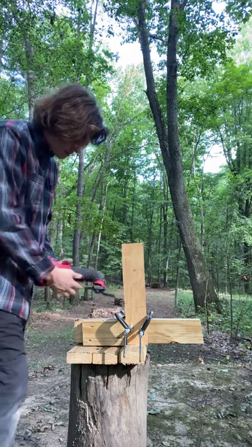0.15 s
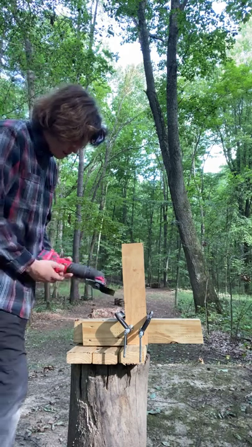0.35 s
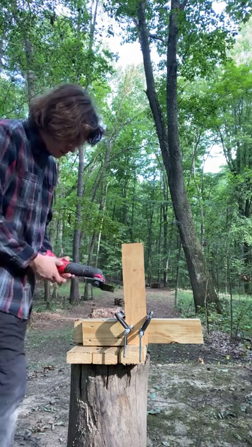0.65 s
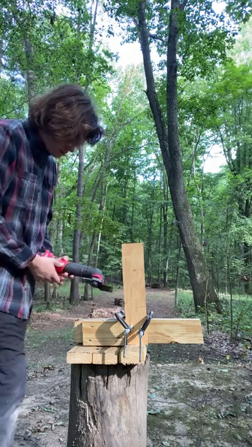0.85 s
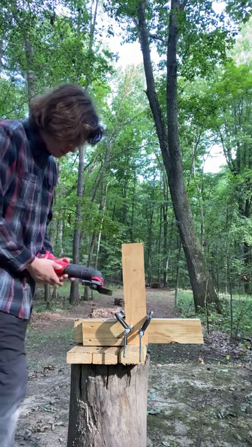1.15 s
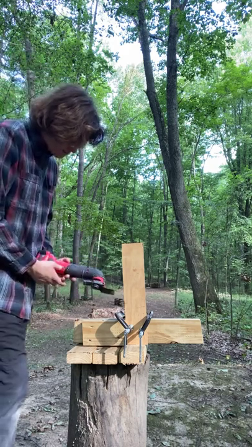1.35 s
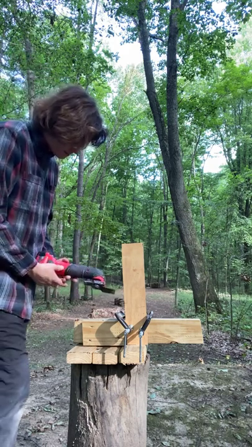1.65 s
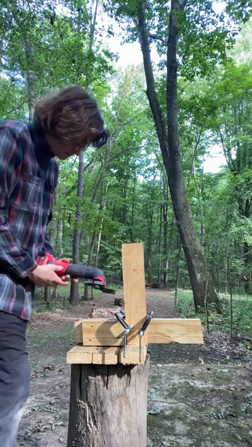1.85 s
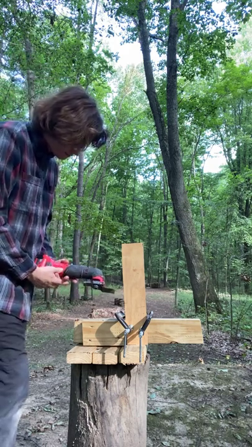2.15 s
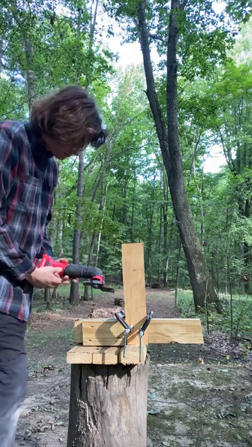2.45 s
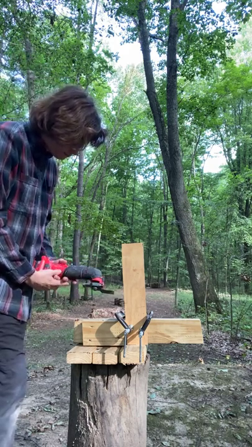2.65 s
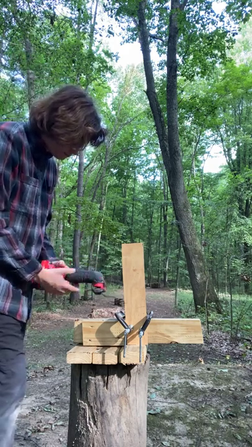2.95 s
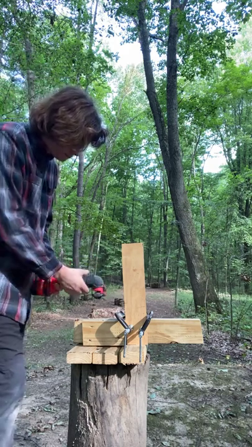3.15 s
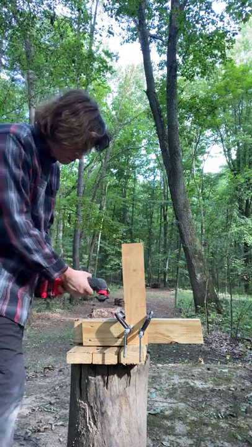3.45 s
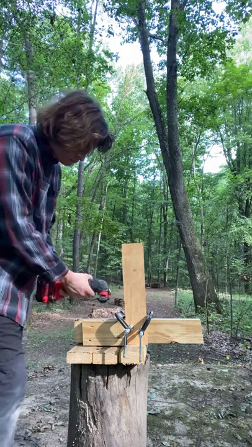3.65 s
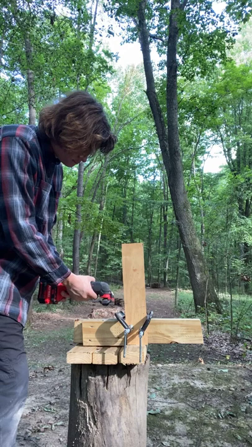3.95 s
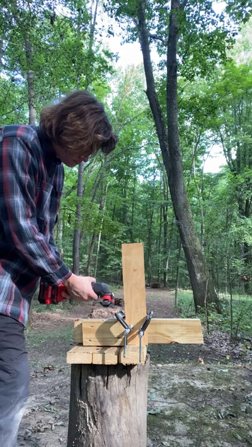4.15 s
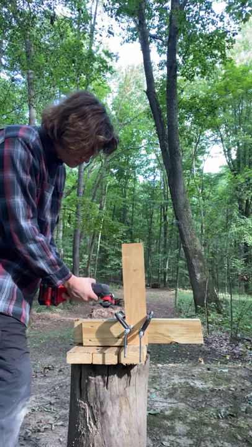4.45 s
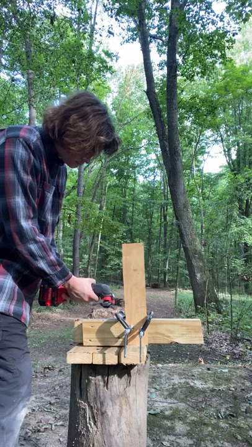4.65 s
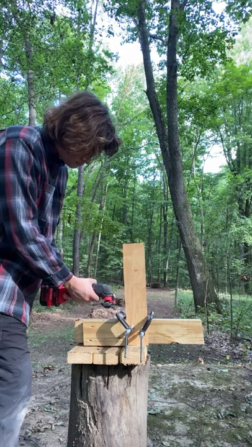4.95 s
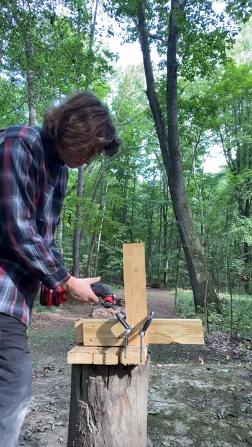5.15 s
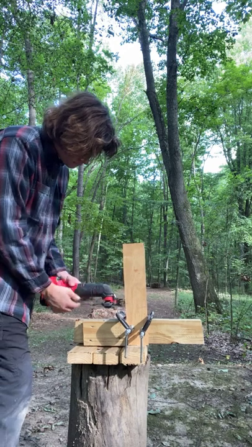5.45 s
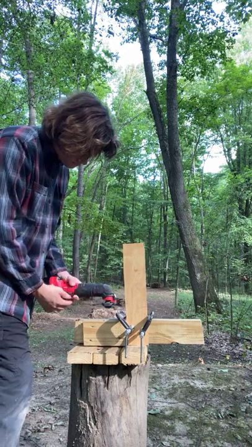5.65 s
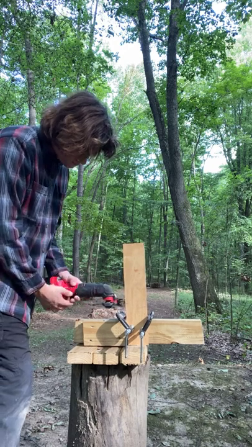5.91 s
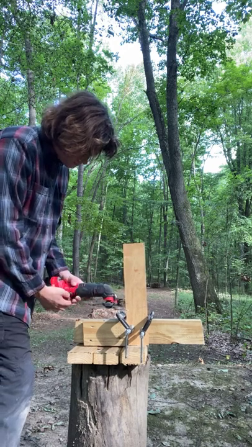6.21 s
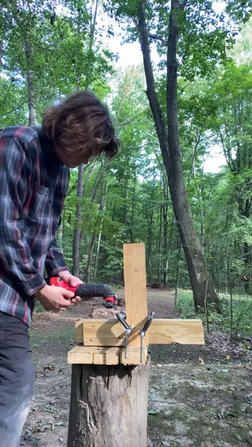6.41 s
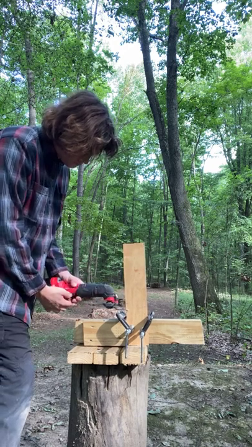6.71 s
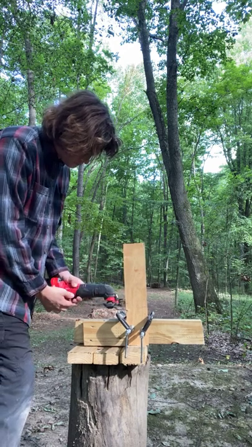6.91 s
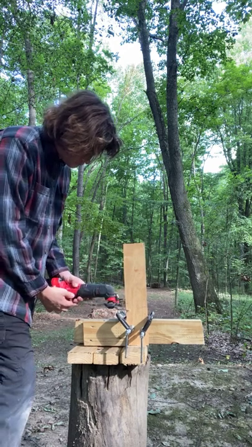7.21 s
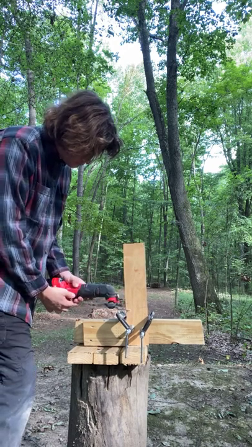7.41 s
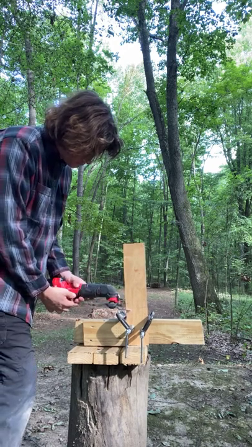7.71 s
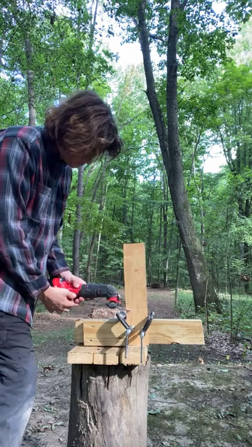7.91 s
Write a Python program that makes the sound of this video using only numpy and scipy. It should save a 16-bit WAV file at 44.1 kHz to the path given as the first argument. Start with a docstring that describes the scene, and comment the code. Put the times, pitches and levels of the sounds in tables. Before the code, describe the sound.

For over three seconds the forest is calm, with shimmering crickets, gentle air, far birds and low distant hum, broken by bright, crisp dial clicks. Then a heavy clack switches on an oscillating cutter, which whirs up almost instantly to a loud nasal buzz. Pressing into the board lowers its pitch and adds gritty, fluttering rasp and woody resonances. Near the end the load eases and pitch steps upward into a smoother whine. Close, dry, centred outdoor sound.

```python
"""Oscillating tool at work in the woods

A cordless oscillating tool is clicked up to speed setting, switched on and pushed into a plywood board.
Filtered noise gives the insect chorus and moving air; sines give far birds and a distant engine hum.
Each click rings decaying modes. The tool sums multiples and half multiples of its stroke rate with rasp
noise pulsed by each stroke and a narrow band of faint high hiss; load sags the speed and recolours
lines and rasp.
"""
import sys
import numpy as np
from scipy import signal
from scipy.io import wavfile
from scipy.ndimage import uniform_filter1d, map_coordinates

SR = 44100
rng = np.random.default_rng(int(sys.argv[2]) if len(sys.argv) > 2 else 0)


def inscribe(sig):
    """Save sig as 16-bit PCM at rate SR to the path in sys.argv[1].

    A 1-D sig is mono; a 2-D sig holds one channel per row.
    Samples are clipped to [-1, 1] before scaling.
    """
    pcm = np.round(np.clip(np.atleast_2d(sig).T, -1, 1) * 32767)
    wavfile.write(sys.argv[1], SR, pcm.astype(np.int16))


N = 355887

# Spectrum of the moving air: f/Hz, relative density/dB per Hz
AIR_SPECTRUM = [(25, -47), (40, -9.5), (60, -5), (120, -14), (170, -22.5), (260, -25), (600, -26.5),
                (1020, -22.5), (2430, -34), (3400, -42), (4400, -69)]
# Spectrum of the insect chorus: f/Hz, relative density/dB per Hz
CHORUS_SPECTRUM = [(1760, -70), (3000, -24.5), (3460, -15.5), (3570, -8.5), (3760, -12), (3860, -12),
                   (4390, 5), (5430, 1.5), (6420, 4), (7160, -2), (7890, -4.5), (8690, -15), (10200, -27.5),
                   (12800, -39), (14000, -47)]
# Level of the engine hum before its waver: t/s, level/dB
HUM_LEVEL = [(0.36, -58), (0.62, -43.5), (3.45, -44.5), (4.02, -63), (4.4, -66), (4.8, -51), (6.83, -53.5),
             (7.78, -70)]
# Other engine lines before waver and fade: f/Hz, level/dB
ENGINE_LINES = [(48, -64), (94, -72), (113, -55.5), (136, -59), (156, -66.5), (181, -65), (228, -64.5),
                (380, -74)]
# Fade of chorus, air and engine lines behind the tool: t/s, level/dB
SINKING = [(3.45, -0.5), (3.9, -6.5), (7, -15), (7.6, -21)]
# Bird whistles: t/s, length/s, first f/Hz, last f/Hz, level before swell and trees/dB
BIRDS = [(0, 0.5, 2510, 2490, -64), (.6, .13, 2350, 2300, -62), (.8, .3, 2600, 2590, -66),
         (1.31, .32, 3670, 3560, -47), (1.39, .21, 3480, 2890, -50), (2.235, .2, 3670, 3690, -48),
         (2.288, 0.24, 3590, 3070, -49)]
# Clicks and switch: t/s, peak level of the ring/dB, treble lift/dB per octave, share below 1 kHz/dB
CLICKS = [(0.6194, -34, 0, -20), (0.7193, -11, 8, -27), (1.66, -11, 8, -28), (1.738, -12, 11, -24),
          (2.6515, -11.5, 14, -24), (3.3689, -2, 1.5, -14)]
# Modes of the housing: f/Hz, relative level/dB, t60/s
HOUSING_MODES = [(820, -14, .02), (1850, -7, 0.0084), (2430, -7, .006), (3150, -5, 0.0044),
                 (3720, -8, 0.0074), (4807, 2.5, 0.0072), (5900, -6, 0.0058), (8070, -10, 0.004),
                 (9870, -14.5, 0.0033), (11530, -15.5, .003), (14000, -24, 0.0027)]

# Relative strength of the stroke multiples in each working state: multiple/1, level/dB
FREE = [(1, -25), (2, -9.5), (3, -4), (4, -12.5), (5, -10), (6, -23), (7, -5), (8, -11), (9, -5.5),
        (10, -10.5), (11, -5), (12, -4.5), (13, -14), (14, -0.5), (15, -11), (16, 2.5), (17, -2.5),
        (18, -4.5), (19, -12), (20, 0), (21, -15), (22, -2.5), (23, -25), (24, -8), (25, -13)]
TOUCHING = [(1, -18), (2, -11.5), (3, -4), (4, -19), (5, -33), (6, -4), (7, -31), (8, -22), (9, -3),
            (10, -9), (11, -6), (12, -9), (13, 1), (14, -3), (15, -3), (16, -7), (17, -5), (18, -1.5),
            (19, -15), (20, 2), (21, -8), (22, -19), (23, -23), (24, -19), (25, -11)]
BITING = [(1, -24), (2, -15.5), (3, -1), (4, -17), (5, -6.5), (6, 0.5), (7, 4.5), (8, -3), (9, 1.5),
          (10, -2), (11, 2.5), (12, -4), (13, 3), (14, 3), (15, -0.5), (16, -10), (17, -2), (18, 0),
          (19, -1.5), (20, -3), (21, -10), (22, -10), (23, -7), (24, -25), (25, -12)]
CUTTING = [(1, -22), (2, -16.5), (3, -16), (4, -8.5), (5, -12), (6, -13.5), (7, 5), (8, -6), (9, -3.5),
           (10, -4.5), (11, -6.5), (12, -10), (13, -7), (14, -9), (15, -8), (16, -7), (17, -21), (18, -9),
           (19, -25), (20, -12), (21, -8), (22, -7), (23, -7.5), (24, -8.5), (25, -19)]
PUSHING = [(1, -9), (2, -11), (3, -11), (4, -7.5), (5, -8), (6, -5.5), (7, 1.5), (8, -7), (9, -10),
           (10, 1.5), (11, -2), (12, -4), (13, -1.5), (14, -8), (15, 1.5), (16, -16), (17, -0.5), (18, -7),
           (19, -9), (20, -4), (21, -7), (22, 0.5), (23, -3), (24, -15), (25, -20)]
EASING = [(1, -19), (2, -17.5), (3, 3.5), (4, -17), (5, -5), (6, 1.5), (7, 5.5), (8, -2), (9, 1),
          (10, -2.5), (11, -2), (12, -1.5), (13, -2.5), (14, 0), (15, -4), (16, -5), (17, 0), (18, -1),
          (19, -6), (20, -0.5), (21, -10), (22, -19), (23, -22), (24, -14), (25, -7.5)]
THROUGH = [(0.5, -39), (1, -9), (1.5, -29.5), (2, -17.5), (2.5, -18), (3, -9.5), (3.5, -46), (4, -20),
           (4.5, -21), (5, 4.5), (5.5, -24), (6, -16.5), (6.5, -15), (7, -10.5), (7.5, -6), (8, -15),
           (8.5, -12.5), (9, -13.5), (9.5, -15), (10, -10), (10.5, -7.5), (11, -23), (11.5, -21),
           (12, -12.5), (12.5, -19), (13, -14), (13.5, -8.5), (14, -22), (14.5, -22), (15, -9.5),
           (15.5, -14), (16, -8), (16.5, -23), (17, -8), (17.5, -12), (18, -8.5), (18.5, -16), (19, -24),
           (19.5, -26), (20, -28), (20.5, -25), (21, -31), (21.5, -30), (22, -31), (22.5, -17), (23, -34)]
LINES_BY_STATE = (FREE, TOUCHING, BITING, CUTTING, PUSHING, EASING, THROUGH)
# Course of the work: t/s, state/1 (index into LINES_BY_STATE)
STATE = [(4.05, 0), (4.09, 1), (4.24, 1), (4.3, 2), (4.6, 2), (4.82, 3), (6.17, 3), (6.23, 4), (6.675, 4),
         (6.7, 5), (7.075, 5), (7.1, 6)]
# Manner of each state: offset of half multiples/dB, flutter scale/dB, smear/1, load/1,
# first-order shake at full speed over tool level/dB, brightness/dB per octave
MANNER = [(-9.5, 1.5, 0.03, 0.17, -26, 1.46), (-20, 3, 0.13, 0.54, -27.5, .5),
          (-35, 2.5, 0.07, 0.6, -26, 0.6), (-31, 2.5, 0.22, 0.79, -25, 0.54),
          (-25, 2, 0.23, 0.84, -19.5, 0.64), (-17, 3, 0.19, 0.51, -20.5, -0.5),
          (-2.5, 1.5, 0.03, 0.25, -12, 0.5)]
# Rasp spectra unloaded and loaded: f/Hz, relative density/dB per Hz
RASP_FREE = [(100, -41), (350, -47), (800, -19), (1050, -26), (1450, -22), (2100, -20.5), (3500, -10.5),
             (4400, -12.5), (5030, -3), (5600, -14.5), (7000, -19), (10000, -32.5), (14800, -41.5),
             (15800, -60)]
RASP_CUT = [(100, -45), (350, -24), (680, -15), (810, 1), (960, -18), (1500, 2.5), (2200, -2), (3500, -2.5),
            (4400, -3.5), (5030, 0.5), (5600, -4), (7000, -15.5), (14800, -38), (15800, -57)]
# Bands of faint high hiss: f/Hz, width of each of two passes/Hz, relative level/dB
HIGH_HISS_BANDS = [(13900, 480, -3), (14800, 140, -1)]
# Level of the high hiss: t/s, level/dB
HIGH_HISS_LEVEL = [(3.47, -69), (5.4, -49), (5.7, -58), (5.78, -49), (6.68, -50), (6.72, -56), (8.07, -53)]
# Resonances of board and blade: f/Hz, width/Hz, lift while the wood damps them/dB
BOARD = [(720, 69, -6.5), (867, 65, -2.5), (1466, 135, -8.5), (2160, 150, -6), (3310, 210, -2)]
# Spells of free ringing, one table a resonance: t/s, length/s, added lift/dB
RINGING = [
    [(4.06, .2, 4.5), (4.27, 0.2, 10.5)],
    [(4.72, 0.16, 11.5), (5.1, .14, 7), (5.78, 0.12, 7.5), (6.07, 0.073, 7.5)],
    [(4.06, 0.048, 10.5), (4.19, 0.31, 11), (4.88, 0.26, 7.5), (5.19, .17, 10), (5.4, 0.45, 5.5),
     (5.9, 0.18, 5.5), (6.11, 0.072, 5), (6.22, .21, 11.5), (6.5, .1, 9.5), (6.63, 0.074, 8)],
    [(4.27, 0.17, 10), (4.7, 0.083, 12.5), (4.88, .08, 8), (4.99, 0.162, 12), (5.33, 0.26, 8),
     (5.8, 0.12, 9), (6.52, .13, 7)],
    [(4.1, 0.17, 4), (4.29, .13, 6.5), (4.44, .12, 1)],
]
# First twitch of the motor: t/s, f/Hz, level before its rise and decay/dB, t60/s
TWITCH = (3.434, 2000, -38, .04)
# Speed the motor heads for, as load and the dial set it: t/s, stroke rate/Hz
SPEED = [(3.7, 250.5), (4.02, 248.9), (4.26, 245.1), (4.38, 236.8), (4.59, 229), (4.75, 216.1),
         (4.86, 213.6), (5.12, 216), (5.26, 211.4), (5.61, 214), (5.94, 210.9), (6.05, 213), (6.17, 207.6),
         (6.19, 219.6), (6.28, 218), (6.36, 226.3), (6.41, 226.4), (6.43, 220.5), (6.55, 217.1),
         (6.675, 225.5), (6.685, 253.6), (7.07, 254.6), (7.078, 283.2), (7.4, 286), (8.07, 283.3)]
# Course of the tool: t/s, level/dB, rasp over tone/dB
EFFORT = [(3.43, -38, -4), (3.47, -21, 2), (3.48, -17.5, -5), (3.66, -14, -5), (3.74, -18, -4.5),
          (4.05, -16, -5.5), (4.15, -13.5, -6), (4.27, -16.5, -3), (4.32, -13, -8), (4.42, -17, -6.5),
          (4.8, -19, -5), (5.29, -17, -3), (5.64, -19.5, -6), (5.83, -17, -3), (6.41, -18.5, -1),
          (6.74, -16, -4.5), (7.07, -15.5, -7), (7.1, -12.5, -7.5), (7.47, -15.5, -9), (7.59, -14.5, -8),
          (7.73, -17.5, -7.5), (8.07, -17.5, -8.5)]

AIR_DB, AIR_START_DB, AIR_RISE_S = -45.5, -3.5, 1.7  # the air starts softer and swells
INSECTS_DB = -39.5  # before throb and fade
HUM_HZ, HUM_WANDER_HZ = 75.2, 0.83
WHISTLE_PEAK = .35  # share of a bird whistle at which the level below is 0 dB
WHISTLE_START_DB, WHISTLE_END_DB = 1, -3  # against the level at that share
GLIDE_BEND = .7  # exponent under 1: the glide slows down
SWITCH_S, HEARD_FROM_S = 3.392, 3.43
SPIN_UP_S, INERTIA_S = .065, .02  # time constants
SHAKE_DB_PER_OCTAVE = 14  # growth of the first-order shake with spin-up speed
RING_EDGE_S = 0.018
PHASE_SPREAD = 0.58  # turns; under 1 the multiples line up into one push a stroke
EDGE_HZ = 15780


def amp(db):
    """Level definition: 20 dB is a factor of ten in amplitude."""
    return 10 ** (np.asarray(db) / 20)


def evened(x):
    """Normalisation to unit rms."""
    return x / np.sqrt(np.mean(x ** 2) + 1e-20)


def play(rows, t):
    """Linear interpolation in time of each column of a curve table."""
    s, *columns = np.transpose(rows)
    return [np.interp(t, s, c) for c in columns]


def read(points, hz):
    """Interpolation of a spectrum on a logarithmic frequency axis."""
    f, value = np.transpose(points)
    return np.interp(np.log(hz + 1), np.log(f + 1), value)


def drift(per_s, count):
    """Slow random modulation: cubic curves through normal random knots."""
    steps = int(N / SR * per_s * 2) + 3
    knots = rng.standard_normal((count, steps))
    t = np.arange(0, N, 32) / SR * per_s * 2
    rows = [map_coordinates(k, [t], order=3) for k in knots]
    return np.repeat(rows, 32, axis=1)[:, :N]


def resonate(x, hz, width):
    """Heterodyne resonance: shift to zero frequency, low-pass, shift back."""
    turn = np.exp(2j * np.pi * np.cumsum(hz * np.ones(len(x))) / SR)
    r = np.exp(-np.pi * width / SR)
    return 2 * (turn * signal.lfilter([1 - r], [1, -r], x / turn)).real


def hiss(field_db, size, patchy_db):
    """Spectral shaping of noise by a level field over (f/Hz, t/s) with random patches."""
    hz = np.fft.rfftfreq(size, 1 / SR)[:, None]
    t = np.arange(4 * N // size + 6) * size / 4 / SR
    a, b, patches = rng.standard_normal((len(t), len(hz), 3)).T
    patches = evened(uniform_filter1d(uniform_filter1d(patches, 8, 0), 10, 1))
    z = (a + 1j * b) * amp(field_db(hz, t) + patchy_db * patches)
    return evened(signal.istft(z, nperseg=size, noverlap=size * 3 // 4)[1][:N])


def insects(t):
    """Amplitude modulation: a faint throb about 13 Hz on chorus noise."""
    throb = 1 + 0.059 * np.cos(2 * np.pi * 13 * t + 4.2 * drift(0.55, count=1)[0])
    noise = hiss(lambda f, s: read(CHORUS_SPECTRUM, f), size=256, patchy_db=0.5)
    return amp(INSECTS_DB) * throb * noise


def moving_air(t):
    """Broadband turbulence, as shaped noise that swells at the start."""
    level_db = AIR_DB + AIR_START_DB * np.clip(1 - t / AIR_RISE_S, 0, 1)
    return amp(level_db) * hiss(lambda f, s: read(AIR_SPECTRUM, f), size=2048, patchy_db=1.8)


def distant_engine(t):
    """Line spectrum: a hum of wandering pitch and further lines that waver in level and phase."""
    hz = HUM_HZ + HUM_WANDER_HZ * drift(1.22, count=1)[0]
    waver = drift(3.5, count=len(ENGINE_LINES) + 1)
    hum_db = play(HUM_LEVEL, t)[0] + 0.91 * waver[-1]
    # sqrt(2) gives a sine of rms 1
    hum = np.sqrt(2) * amp(hum_db) * np.sin(2 * np.pi * np.cumsum(hz) / SR)
    lines = sum(amp(db + 4.0 * w) * np.sin(2 * np.pi * f * t + 0.88 * w[::-1])
                for (f, db), w in zip(ENGINE_LINES, waver))
    return hum, np.sqrt(2) * lines


def woods():
    """Superposition of background sources; all but the main hum share one fade."""
    t = np.arange(N) / SR
    hum, lines = distant_engine(t)
    return hum + (insects(t) + moving_air(t) + lines) * amp(play(SINKING, t)[0])


def birds():
    """Frequency glides of far whistles, drawn out by scattering among the trees."""
    out = np.zeros(N)
    for s, length, first_hz, last_hz, db in BIRDS:
        u = np.arange(round(length * SR)) / (length * SR)
        jitter_hz = 600 * uniform_filter1d(rng.standard_normal(SR), 300)[:len(u)]
        hz = first_hz + (last_hz - first_hz) * u ** GLIDE_BEND + jitter_hz
        swell_db = np.interp(u, [0, WHISTLE_PEAK, 1], [WHISTLE_START_DB, 0, WHISTLE_END_DB])
        whistle = np.sin(2 * np.pi * np.cumsum(hz) / SR) * signal.windows.tukey(len(u), .2)
        at = round(s * SR)
        out[at:at + len(u)] += amp(db + swell_db) * whistle
    t = np.arange(SR // 2) / SR
    trees = rng.standard_normal(len(t)) * amp(-60 * t / .8)  # t60 0.8 s
    scattered = signal.oaconvolve(out, trees / np.linalg.norm(trees))[:N]
    return amp(-4) * out + amp(-3) * scattered


def buttons():
    """Modal ringing of the housing by a snap and its rebound; stump and ground scatter a tail."""
    out, t = np.zeros(N + 4000), np.arange(2000) / SR
    chances = rng.random((len(CLICKS), len(HOUSING_MODES), 2))
    for (s, db, treble_db, bass_db), chance in zip(CLICKS, chances):
        ring = np.zeros(len(t))
        for (f, mode_db, t60), (p, q) in zip(HOUSING_MODES, chance):
            tilt_db = treble_db * max(np.log2(f / 4800), 0) + bass_db * (f < 1000)
            decay_db = mode_db - 60 * t / t60 + tilt_db + 2.4 * (q - .5)
            ring += amp(decay_db) * np.sin(2 * np.pi * (f * t + 0.76 * p))
        ring *= 1 - np.exp(-t / 0.00054)  # soft onset
        ring *= amp(db) / abs(ring).max()
        for delay, echo_db in ((0, -2), (.0026, -11)):  # snap, rebound
            at = round((s + delay) * SR)
            out[at:at + len(t)] += amp(echo_db) * ring
    t = np.arange(4000) / SR
    scatter = rng.standard_normal(len(t)) * amp(-60 * t / 0.2) * (t > .003)
    scatter = uniform_filter1d(scatter, size=3)  # the tail is duller than the snap
    tail = signal.oaconvolve(out, scatter / np.linalg.norm(scatter))[:len(out)]
    return (out + amp(-17) * tail)[:N]


def motor(t):
    """Rotational inertia: the stroke rate lags its goal and climbs from rest after the switch."""
    lag = np.exp(-1 / (INERTIA_S * SR))
    goal = play(SPEED, t)[0]
    spun = 1 - np.exp(-np.maximum(t - SWITCH_S, 1e-3) / SPIN_UP_S)
    lagged = goal[0] + signal.lfilter([1 - lag], [1, -lag], goal - goal[0])
    return spun * lagged, spun


def ringing(t):
    """Damping of board resonances from touch to easing, with added lift/dB in freer spells."""
    entered = np.clip((t - STATE[0][0]) / RING_EDGE_S, 0, 1)
    buried = entered * np.clip((STATE[-3][0] - t) / RING_EDGE_S, 0, 1)
    lifts = []
    for (_, _, damped_db), spells in zip(BOARD, RINGING):
        lift_db = damped_db * buried
        for s, length, db in spells:
            inside = np.minimum(t - s, s + length - t)
            lift_db = lift_db + db * np.clip(inside / RING_EDGE_S + .5, 0, 1)
        lifts.append(lift_db)
    return lifts


def stroke_tone(t, hz, spun, turns, state, manner, fast):
    """Fourier series of a periodic stroke, with half multiples, coloured by state and resonance."""
    _, flutter_db, smear, _, _, bright = manner
    states = np.arange(len(MANNER))
    rings = ringing(t[::64])
    slow = drift(11, count=12)
    tone, power = np.zeros(N), np.zeros(N)
    for n in range(1, 51):
        k = n / 2
        if n == 2:  # the first order is the shake
            continue
        by_state = [np.interp(k, *np.transpose(lines)) + m[0] * (n % 2)
                    for lines, m in zip(LINES_BY_STATE, MANNER)]
        # while spinning up, the lines sweep through the fixed colour of the housing
        sweep_db = np.interp(k * spun, *np.transpose(FREE)) - np.interp(k, *np.transpose(FREE))
        bright_db = bright * np.log2(k * hz / 2500)
        gain = amp(np.interp(state, states, by_state) + sweep_db * (k > 4) + bright_db)
        power += gain ** 2 / 2
        lift_db = sum(db * np.exp(-((k * hz[::64] - f) / w) ** 2)
                      for db, (f, w, _) in zip(rings, BOARD))
        gain *= amp(np.repeat(lift_db, 64)[:N])
        # uneven tooth contact shakes the level and phase of the higher multiples more
        gain *= amp(min(k / 9, 1.3) * flutter_db * slow[n % 12])
        wobble = (k / 9) ** 1.19 * smear * 2.4 * fast[(5 * n) % 12]
        phase = k * turns + PHASE_SPREAD * (rng.random() - .5)
        tone += gain * np.cos(2 * np.pi * phase + wobble)
    return tone / np.sqrt(power + 1e-12)  # power is taken before board lift and flutter


def gear_and_tooth_rasp(t, turns, manner, fast):
    """Friction noise of gears and teeth, recoloured by load and modulated by the stroke."""
    bright = manner[5]
    states, loads = np.arange(len(MANNER)), np.clip(np.transpose(MANNER)[3], 0, 1)

    def field(f, s):
        load = np.interp(play(STATE, s)[0], states, loads)
        bright_db = np.interp(s, t, bright) * np.log2(np.clip(f, 300, 9000) / 2500)
        return (1 - load) * read(RASP_FREE, f) + load * read(RASP_CUT, f) + bright_db

    rasp = hiss(field, size=512, patchy_db=1.5)
    rasp /= np.sqrt(uniform_filter1d(rasp ** 2, 9000))
    # the teeth scrape once each way, harder on the forward stroke
    pulse = 1 + 0.36 * np.cos(4 * np.pi * turns) + 0.12 * np.cos(2 * np.pi * turns)
    pulse += 0.017 * np.cos(np.pi * turns)
    rasp *= pulse * amp(0.8 * fast[0])
    # each pass of the teeth catches the fibres with its own force
    passes = (2 * turns).astype(int)
    return rasp * uniform_filter1d(amp(0.74 * rng.standard_normal(5000)[passes]), 20)


def high_hiss(t):
    """Band-pass filtering: white noise passed twice through narrow bands near 14 to 15 kHz."""
    white = rng.standard_normal(N)
    bands = [amp(db) * evened(resonate(resonate(white, f, w), f, w)) for f, w, db in HIGH_HISS_BANDS]
    return amp(play(HIGH_HISS_LEVEL, t)[0]) * evened(sum(bands))


def motor_twitch(t):
    """Damped oscillation at the first twitch of the motor."""
    start, f, db, t60 = TWITCH
    since = np.maximum(t - start, 0)
    rise = np.minimum(since / 0.0047, 1)
    return amp(db - 60 * since / t60) * np.sin(2 * np.pi * f * since) * rise


def tool():
    """Superposition of stroke lines, rasp, first-order shake, high hiss and first twitch."""
    t = np.arange(N) / SR
    hz, spun = motor(t)
    turns = np.cumsum(hz) / SR
    level_db, rough_db = play(EFFORT, t)
    state = play(STATE, t)[0]
    manner = [np.interp(state, np.arange(len(MANNER)), c) for c in np.transpose(MANNER)]
    fast = drift(45, count=12)
    tone = stroke_tone(t, hz, spun, turns, state, manner, fast)
    rasp = gear_and_tooth_rasp(t, turns, manner, fast)
    mix = (tone + amp(rough_db) * rasp) / np.sqrt(1 + amp(2 * rough_db))
    shake_db = manner[4] + SHAKE_DB_PER_OCTAVE * np.log2(spun)
    shake = np.sqrt(2) * amp(shake_db) * np.cos(2 * np.pi * turns)
    running = np.clip((t - HEARD_FROM_S) / 0.02, 0, 1)
    return motor_twitch(t) + running * (amp(level_db) * (mix + shake) + high_hiss(t))


def scene():
    """Linear superposition of all sources, identical in both channels."""
    mono = woods() + birds() + buttons() + tool()
    return np.array([mono, mono])


def record(dry):
    """Saturation and band limitation: peaks are rounded, lowest bass and top treble removed."""
    dry = dry / (1 + (dry / .9) ** 6) ** (1 / 6)
    dry = signal.sosfilt(signal.butter(6, 40, "high", fs=SR, output="sos"), dry)
    low_pass = signal.firwin(511, EDGE_HZ, window=("kaiser", 9), fs=SR)
    return signal.oaconvolve(dry, low_pass[None], "same")


dry = scene()
out = record(dry)
inscribe(out)
```